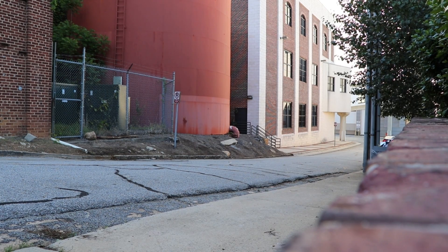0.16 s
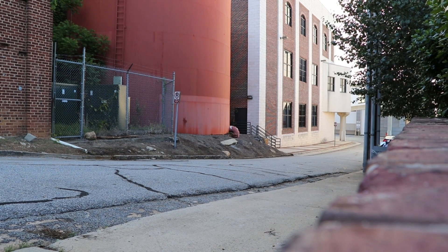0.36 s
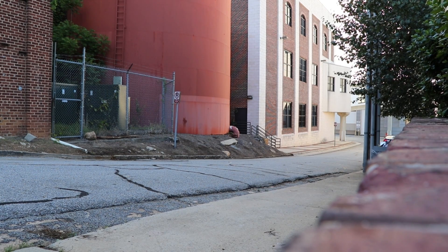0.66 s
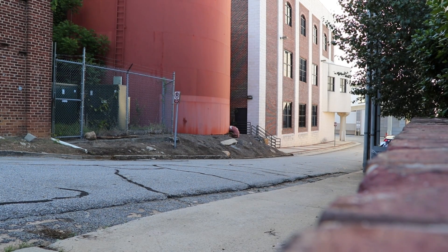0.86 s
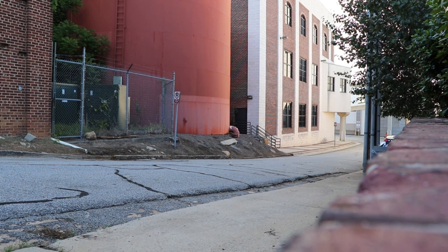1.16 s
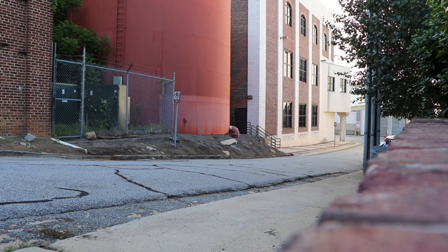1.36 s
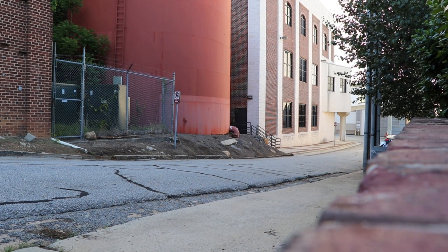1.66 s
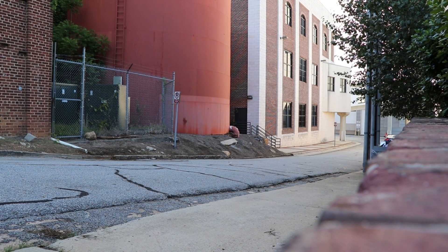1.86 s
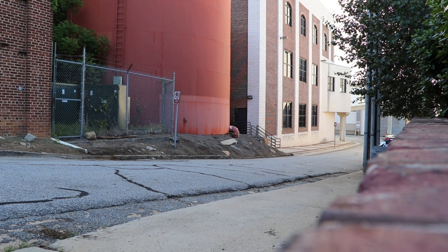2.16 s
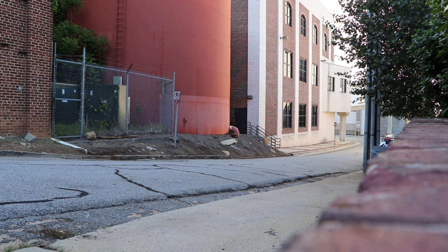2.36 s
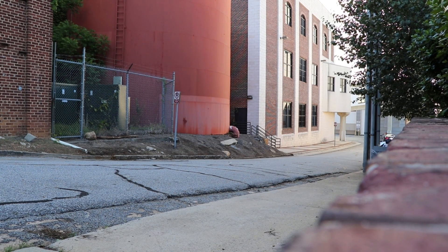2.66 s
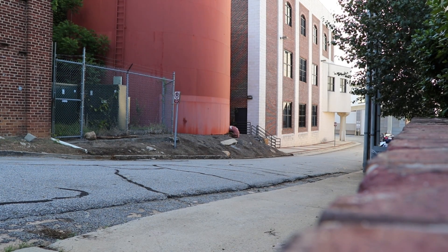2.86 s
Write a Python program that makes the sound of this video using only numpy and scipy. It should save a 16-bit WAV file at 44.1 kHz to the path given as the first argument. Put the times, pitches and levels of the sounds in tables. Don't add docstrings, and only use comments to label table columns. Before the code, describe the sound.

A car with a loud open exhaust drones up from low revs, approaching through a brick alley

```python
import sys
import numpy as np
from scipy import signal
from scipy.fft import rfft, irfft, next_fast_len
from scipy.io import wavfile
from scipy.ndimage import uniform_filter1d

SR = 44100
rng = np.random.default_rng(int(sys.argv[2]) if len(sys.argv) > 2 else 0)


def to_wav(s):
    ch = np.atleast_2d(s).T
    pcm = np.round(np.clip(ch, -1, 1) * 32767)
    wavfile.write(sys.argv[1], SR, pcm.astype(np.int16))


def invert_db(level):
    return 10 ** (np.asarray(level, dtype=float) / 20)


N = 132300

# (time [s], firing base [Hz])
REVS = [(0.0, 36.7), (0.08, 37.4), (0.35, 38.9), (0.43, 38.8), (0.88, 44.5), (1.13, 48.2), (1.35, 49.7),
        (1.58, 51.9), (1.85, 54.4), (2.04, 57.5), (2.18, 60.9), (2.36, 65.0), (2.6, 70.3), (2.94, 79.4),
        (3.0, 80.5)]
# (time [s], level [dB])
EFFORT = [
    (0, -29),
    (.4, -26.5),
    (.8, -27),
    (1.1, -29),
    (1.4, -27),
    (1.8, -25.5),
    (2.1, -23),
    (2.35, -23.5),
    (2.6, -21.5),
    (3, -20.5),
]
# (multiple of the firing base [-], level [dB])
ORDERS = [(1, 5.5), (2, 0), (3, -1.9), (4, -2.8), (5, -11), (6, -15), (7, -15), (8, -13), (9, -17),
          (10, -18), (12, -20)]
# (frequency [Hz], width [Hz], level [dB])
RESONANCES = [(55.1, 4.2, -5.7), (62.2, 1.8, -12.3), (73.7, 3.0, -15.6), (93.0, 4.2, -12.8), (99.4, 9.2, -7.3),
              (107.3, 1.9, 5.0), (114.2, 0.9, -4.3), (124.5, 7.1, -0.2), (131.2, 2.4, 0.4), (136.7, 7.0, -0.6),
              (145.8, 3.5, -1.1), (151.3, 2.6, -6.6), (160.3, 1.5, -7.1), (164.3, 1.8, -14.0),
              (216, 28, -14), (242.7, 4.2, -6.7), (255.3, 7.3, -1.8), (266.6, 3, 3), (286.4, 3.4, -12.7),
         (302, 24, -12), (358, 24, -3), (398, 22, -5),
              (499, 47, -7), (616, 37, -6.5), (1320, 68, -10)]
# (frequency [Hz], width [Hz], level [dB])
GAS = [(367.6, 116, 0), (520, 620, -7)]
# (time [s], peak level [dB], ring frequency [Hz], ring level [dB])
TICKS = [
    (0.6072, -40.5, 1200, 7),
    (0.616, -40.5, 2600, -3.5),
    (.785, -51, 2300, 7),
    (.915, -51, 2230, 10.5),
    (.9607, -41.5, 1160, 6.5),
    (2.862, -48, 2200, 8),
    (2.9693, -43, 1300, 9),
]
# (time [s], peak level [dB], ring frequency [Hz], ring level [dB])
SNAPS = [
    (1.4987, -25, 1000, -9),
    (1.5073, -23, 2800, -18),
]
# (frequency [Hz], rms level [dB])
FAN_TONES = [(170, -50), (377, -58), (479, -56), (823, -67)]
# (frequency [Hz], rms level [dB])
WHINE = [(2945, -81), (3833, -71), (3946, -77), (4054, -83.5), (4167, -79.5), (4280, -81.5)]
# (frequency [Hz], density [dB per Hz])
TOWN_MID = [(22, -10), (50, -2.5), (150, 0), (400, -10), (800, -18.5), (1250, -16.5), (2000, -27.5),
            (4100, -36.5)]
# (frequency [Hz], density [dB per Hz])
TOWN_SIDE = [(18, -28), (30, 2), (85, -15), (109, -1), (155, -8.5), (195, -12), (266, -8), (1240, -6.5),
             (4300, -20.5), (5590, -62), (9460, -120)]
# (frequency [Hz], density [dB per Hz])
HISS = [(2880, -21), (4900, -3.5), (8040, 0.5), (10400, -2), (15500, -10.5)]

OPPOSED = np.array([[1], [-1]])


def level(x, db):
    return x * invert_db(db) / np.sqrt(np.mean(x ** 2))


def filt(x, response):
    size = next_fast_len(2 * N)
    hz = np.arange(1, size // 2 + 2) * SR / size
    return irfft(rfft(x, size) * response(hz), size)[..., :N]


def ring(hz, table):
    return sum(invert_db(db) / (1 + 1j * (hz / f - f / hz) * f / w) for f, w, db in table)


def walk(rate):
    k = int(SR / rate)
    steps = np.repeat(rng.standard_normal(N // k + 1), k)
    return 1.77 * uniform_filter1d(uniform_filter1d(steps, k), k)[:N]


def noise(table, db, edge):
    f, g = np.array(table).T
    shape = lambda hz: invert_db(np.interp(np.log(hz), np.log(f), g)) * edge(hz)
    return level(filt(rng.standard_normal(N), shape), db)


def resonant_noise(drive, table, db, passes=2):
    return level(filt(drive * rng.standard_normal(N), lambda f: ring(f, table) ** passes), db)


def firing_orders(t, turn):
    tone = 0
    for k, db in ORDERS:
        rise_db = 5 * (k > 5.5) * (t - 3.5)
        order = invert_db(db + 1.1 * walk(11.04)) * np.sin(k * turn)
        half_order = invert_db(db - 20 + 2.9 * walk(9)) * np.sin((k + .5) * turn)
        tone = tone + invert_db(rise_db) * (order + half_order)
    return tone


def exhaust_pipe(x):
    far_wall_s, far_wall_db, bass_cut_hz = .135, -11, 60.5

    def response(f):
        wall = 1 + invert_db(far_wall_db) * np.exp(-2j * np.pi * f * far_wall_s)
        return ring(f, RESONANCES) / np.sqrt(1 + (bass_cut_hz / f) ** 12) * wall

    return filt(x, response)


def car(t):
    throttle_s, opening_s, shut_db = 1.64, 0.2, -10
    turn = 2 * np.pi * np.cumsum(np.interp(t, *np.array(REVS).T)) / SR
    puff = (1 + np.sin(2 * turn)) ** 2
    throttle = invert_db(shut_db / (1 + np.exp((t - throttle_s) / opening_s)))
    rasp = resonant_noise(puff, GAS, -8.5) * throttle
    effort = invert_db(np.interp(t, *np.array(EFFORT).T))
    exhaust = exhaust_pipe(effort * (firing_orders(t, turn) + rasp))
    roar = resonant_noise(2 + puff, [(1200, 1000, 0)], -48)
    return exhaust + roar * invert_db(8 * (t - 3))


def alley(x):
    t60_s, mid_db, mid_low_hz, side_db, side_low_hz = 1, -9, 330, -7.5, 251
    t = np.arange(SR) / SR
    tails = rng.standard_normal((2, SR)) * invert_db(-60 * t / t60_s) * (t > .03)
    mid, side = (signal.fftconvolve(x, h / np.sqrt(np.sum(h ** 2)))[:N] for h in tails)
    mid = filt(mid, lambda f: 1 / np.sqrt(1 + (mid_low_hz / f) ** 6))
    side = filt(side, lambda f: 1 / (1 + side_low_hz / (1j * f)) ** 2)
    return invert_db(mid_db) * mid + invert_db(side_db) * side * OPPOSED


def tyres(t):
    grit = rng.standard_normal((2, N)) * invert_db(1.3 * walk(43) + 15 * (t - 3))
    return invert_db(-45.5) * filt(grit, lambda f: ring(f, [(2600, 3000, 0)]) ** 2)


def gravel(t):
    push_s, rattle_s = .00012, .008
    out = 0
    for s, db, hz, ring_db in TICKS + SNAPS:
        push = np.exp(-((t - s) / push_s) ** 2)
        burst = (t > s) * np.exp(-np.abs(t - s) / rattle_s) * rng.standard_normal(N)
        rattle = filt(burst, lambda f: ring(f, [(hz, hz / 3, 0)]) ** 2)
        out = out + invert_db(db) * (push + invert_db(ring_db) * rattle / np.abs(rattle).max())
    return filt(out, lambda f: 1 / (1 + 400 / (1j * f)))


def machine_tone(t, hz, db, wander_db):
    phase = 2 * np.pi * (hz * t + rng.random())
    return np.sqrt(2) * invert_db(db + wander_db * walk(4.87)) * np.sin(phase)


def plant(t):
    hum = machine_tone(t, 47, -39.5, 0.5)
    fans = sum(machine_tone(t, hz, db, 2.35) for hz, db in FAN_TONES)
    duct = resonant_noise(1, [(1242, 90, 0)], -57, passes=1)
    whine = sum(machine_tone(t, hz, db, 0.5) for hz, db in WHINE)
    return (hum + fans + duct) * np.array([[1.05], [.9]]) + whine * np.array([[1.8], [.3]])


def town():
    edge = lambda hz: 1 / np.sqrt(1 + (hz / 4150) ** 24) / (1 + (18 / hz) ** 4)
    flicker = invert_db(0.8 * walk(11.04))
    mid = noise(TOWN_MID, -38.5, edge)
    side = noise(TOWN_SIDE, -49, edge)
    return flicker * (mid + side * OPPOSED)


def air(t):
    gust = np.exp(-((t - 2.37) / .45) ** 2)
    breeze = resonant_noise(1, [(45, 80, 0)], -51) * invert_db(4 * walk(6)) * gust
    far_hiss = resonant_noise(1, [(3900, 2000, 0)], -64)
    return breeze * np.array([[1.3], [-.7]]) + far_hiss * OPPOSED


def scene():
    t = np.arange(N) / SR
    lag_s, left_db = 0.000085, 0.42
    x = car(t)
    late = filt(x, lambda f: np.exp(-2j * np.pi * f * lag_s))
    direct = np.array([late * invert_db(left_db), x * invert_db(-left_db)])
    return direct + alley(x) + tyres(t) + gravel(t) + plant(t) + town() + air(t)


def microphone_hiss():
    edge = lambda hz: 1 / np.sqrt(1 + (4200 / hz) ** 8)
    return np.array([noise(HISS, -61, edge) for _ in range(2)])


def roll_off(x):
    return signal.sosfilt(signal.butter(12, 15610, fs=SR, output="sos"), x)


def record(dry):
    mix = dry + microphone_hiss()
    return roll_off(mix)


dry = scene()
out = record(dry)
to_wav(out)
```